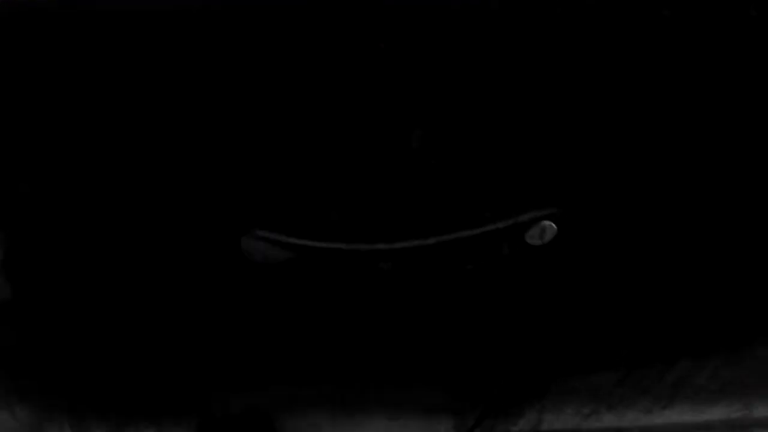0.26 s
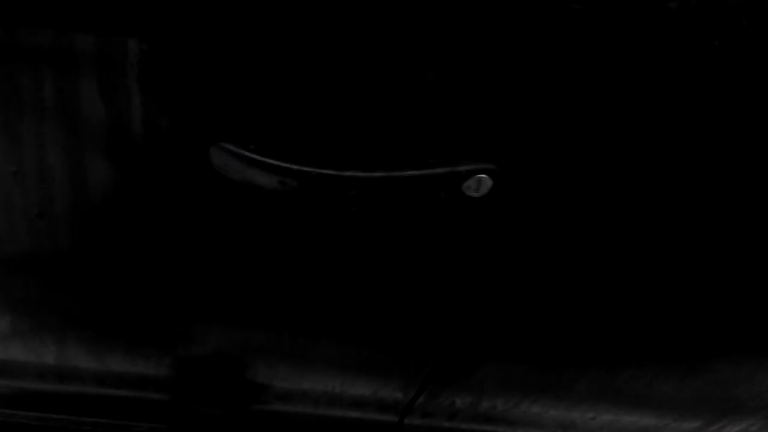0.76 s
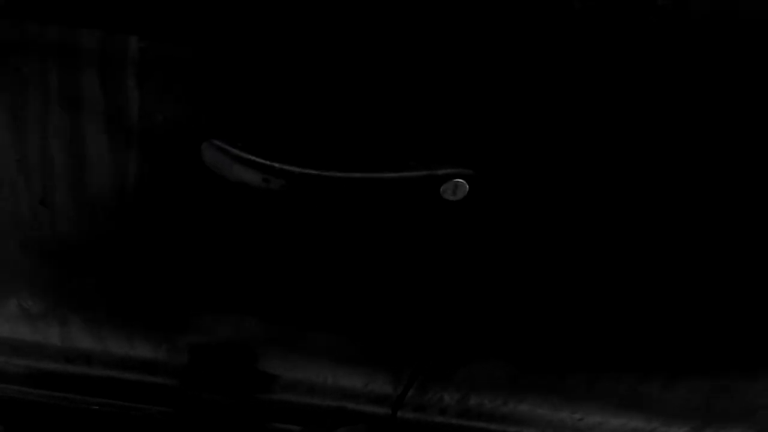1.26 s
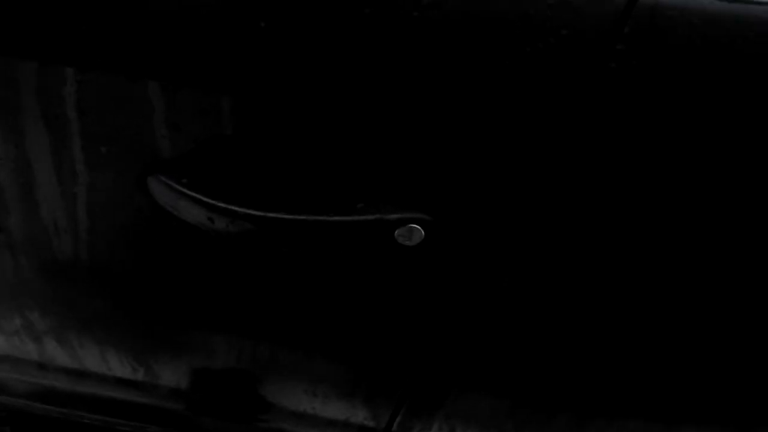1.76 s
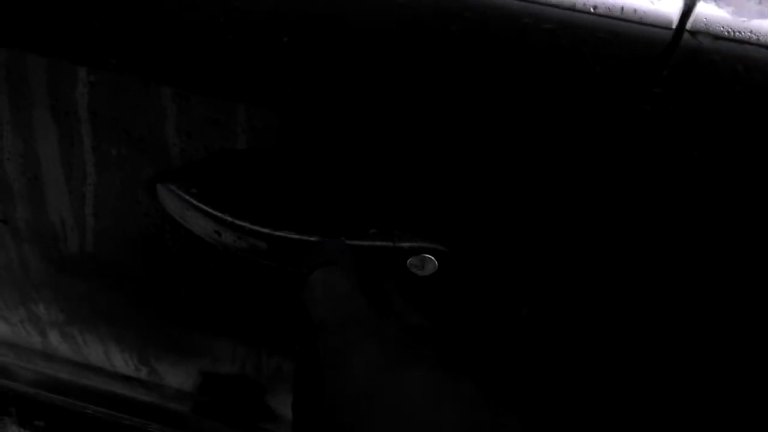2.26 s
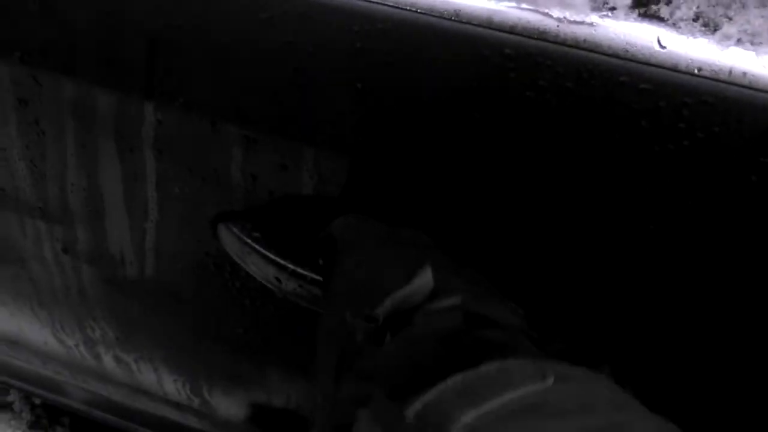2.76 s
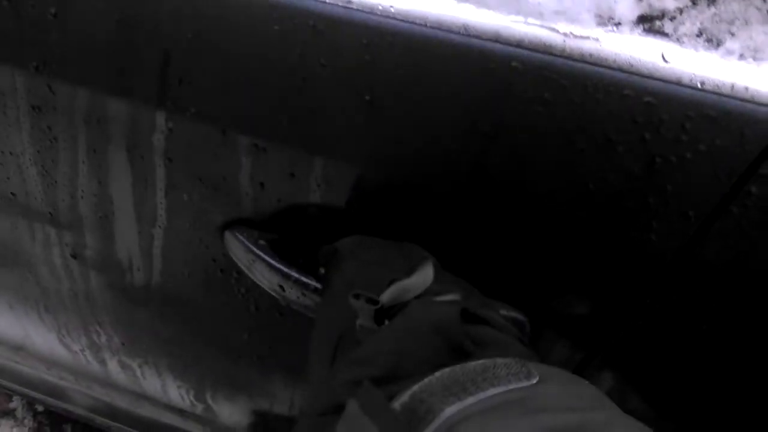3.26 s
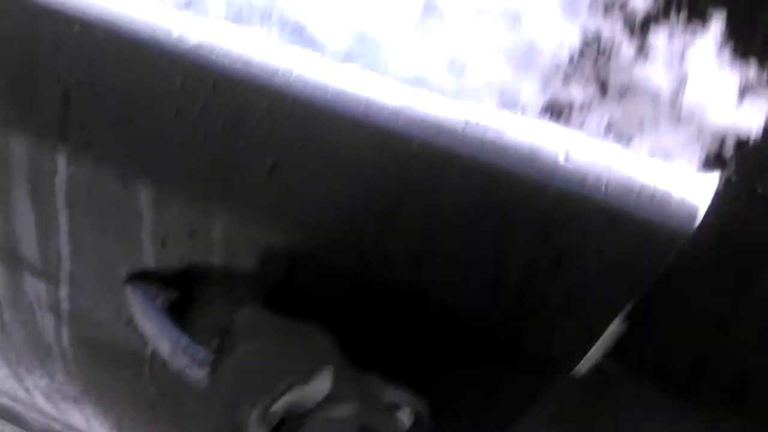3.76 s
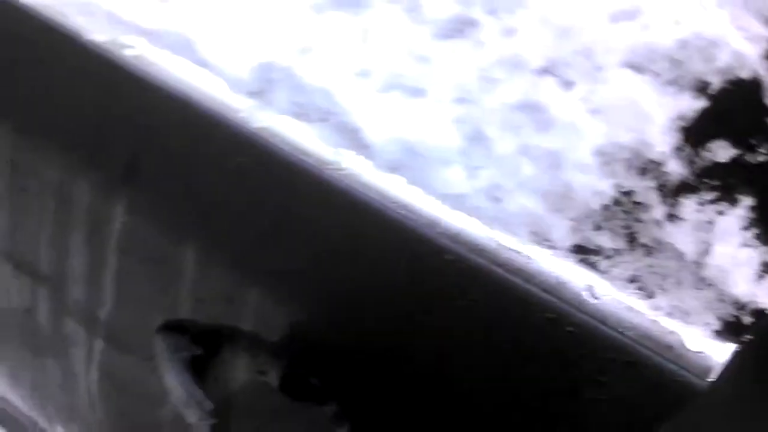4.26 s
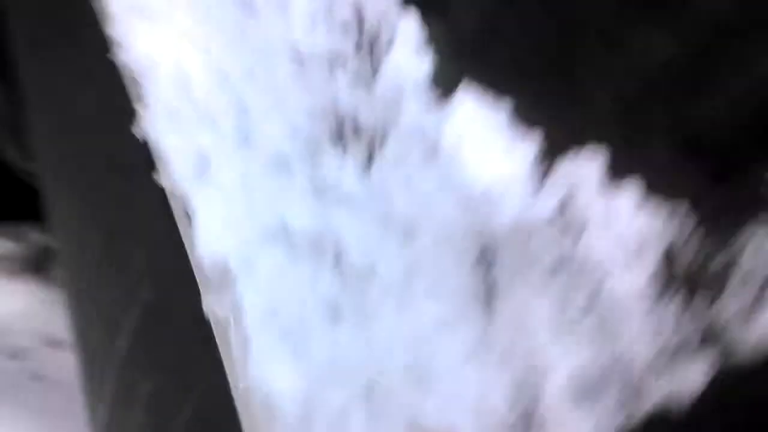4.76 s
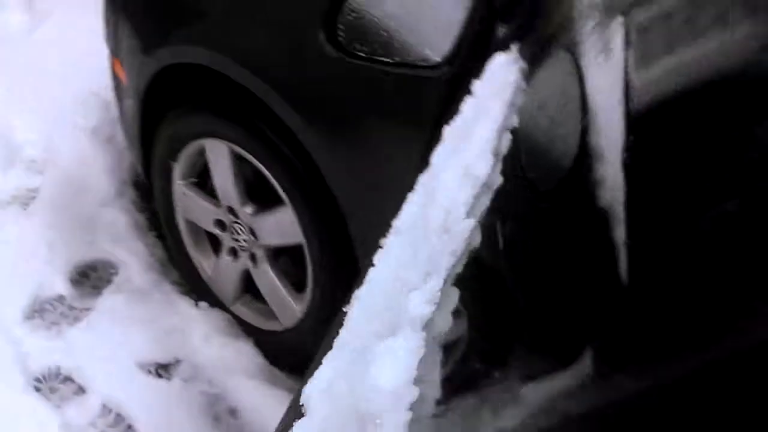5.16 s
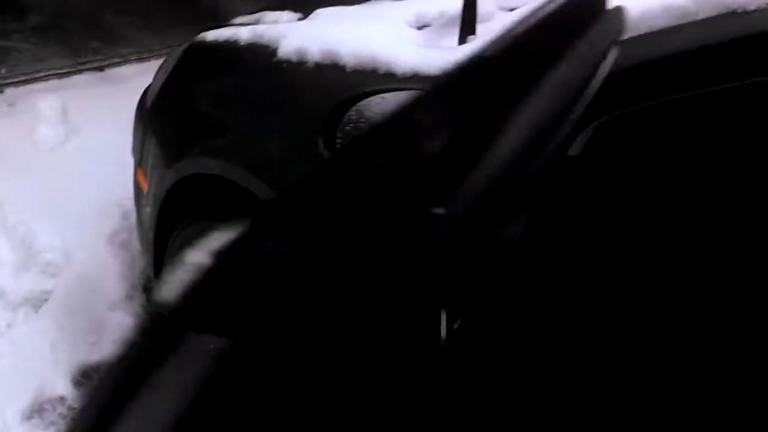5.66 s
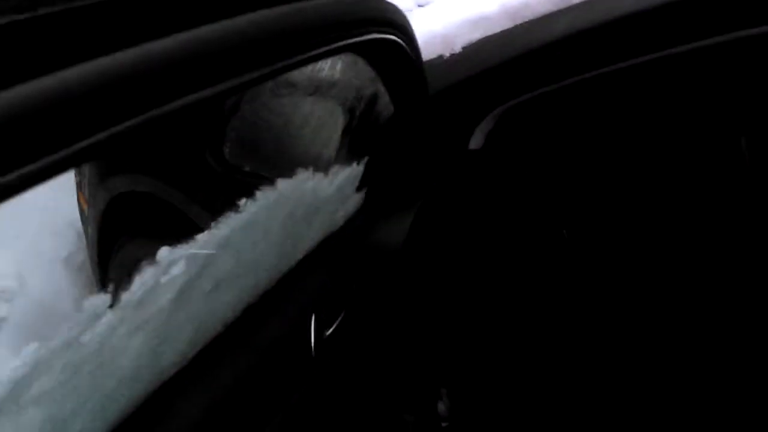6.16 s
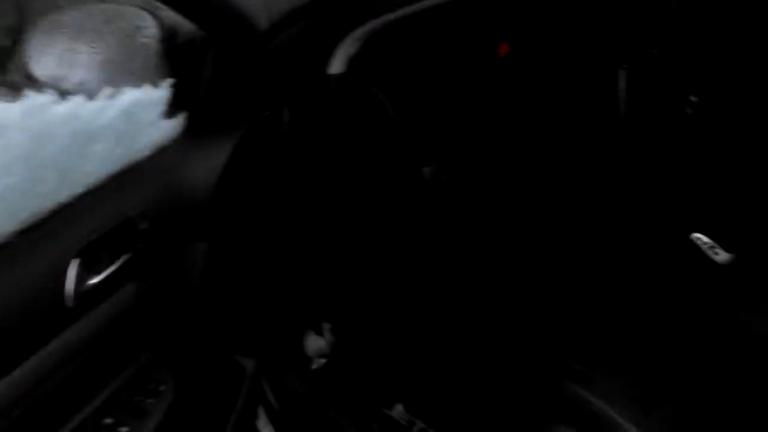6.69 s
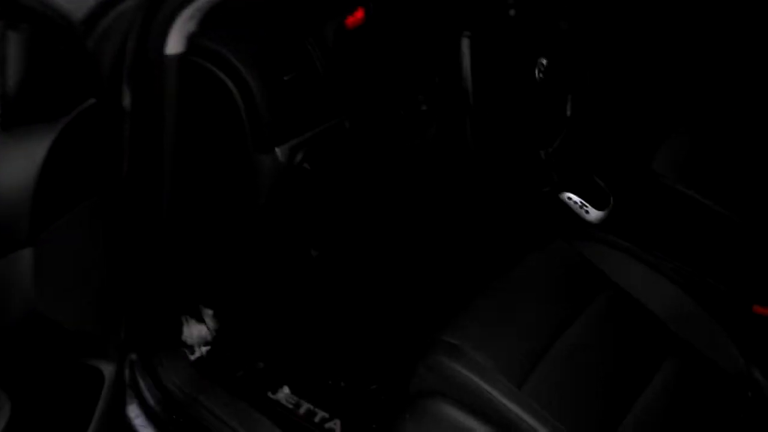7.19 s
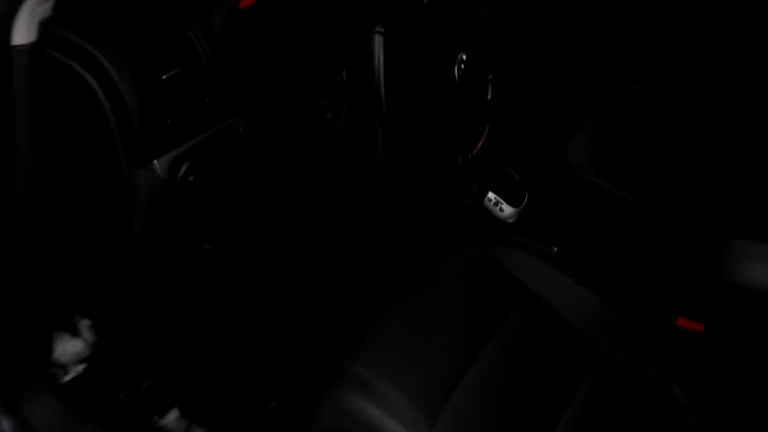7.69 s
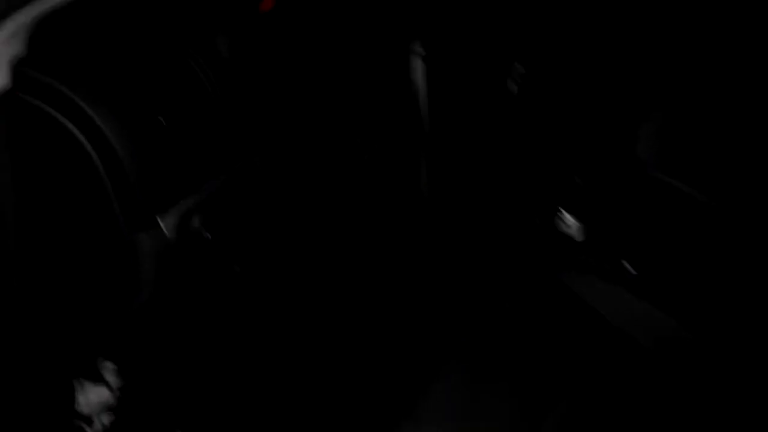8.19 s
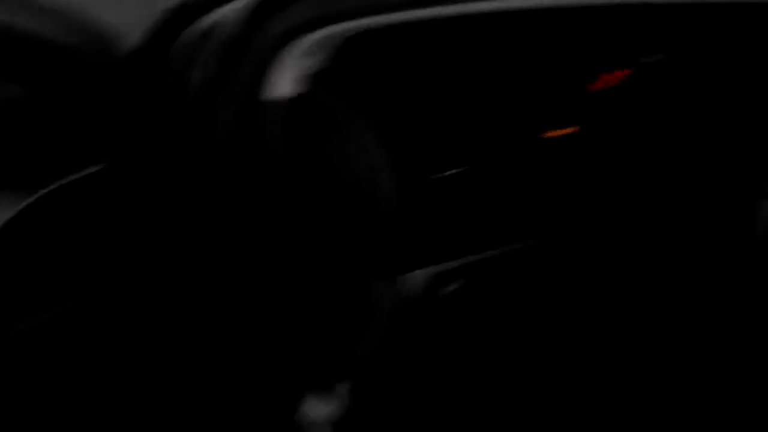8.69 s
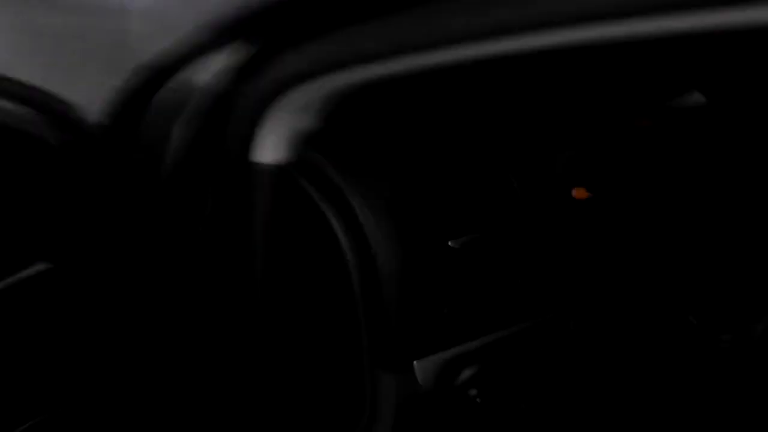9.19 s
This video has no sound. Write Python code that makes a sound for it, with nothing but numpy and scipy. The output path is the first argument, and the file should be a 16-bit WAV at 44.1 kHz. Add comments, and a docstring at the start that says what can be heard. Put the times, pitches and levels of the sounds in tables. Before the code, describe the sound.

A quiet, dry, snowy outdoor space with a very faint steady hush, everything within arm's reach. From 0 to 1.4 s a stiff jacket sleeve swishes in brisk, bright strokes, with crackling creases and a sharp fold snap near 1.35; a tiny squeak and key tick sit around 0.5. Then near silence until light taps on a door handle at 2.4-2.7. At 3.0 the handle groans very faintly, and at 3.3-3.5 the latch clunks in a quick cluster. Cloth rustles at 4.3, then the door knocks loudest at 4.6-4.9, a hard thump with rattle, followed by duller thuds at 5.4-5.6 under swelling sleeve rub. A soft key clink comes at 5.65. Keys jingle thin and high at 7.2-7.7 as the sleeve swishes strongly at 7.6. More crisp swishes and fold snaps follow at 8.4-8.5 with a metallic click, and at 9.0-9.3 with a soft bump.

```python
"""Beside a car on a quiet, snowy day: someone in a stiff winter jacket opens the door and leans in, keys in hand.
The sleeve swishes close to the microphone (noise in four bands, with popping creases and snapping folds).
Handle and latch thump the door panel, which knocks again as it swings over its stops (ringing modes and rattle).
The handle groans faintly (a roughened tone) and the keys clink now and then (high modes and a click).
Behind it all lies a faint, even hush of filtered noise."""
import sys
import numpy as np
from scipy import signal
from scipy.fft import rfft, irfft, next_fast_len
from scipy.io import wavfile
from scipy.ndimage import uniform_filter1d, map_coordinates

SR = 44100
rng = np.random.default_rng(int(sys.argv[2]) if len(sys.argv) > 2 else 0)


def master(y):
    """Save y as 16-bit WAV."""
    cut = np.clip(np.atleast_2d(y).T, -1, 1)
    pcm = np.round(cut * 32767)  # scale
    wavfile.write(sys.argv[1], SR, pcm.astype(np.int16))


N = 416304


def undb(db):
    """Decibels to gain."""
    return 10 ** (np.asarray(db) / 20)


def unit(x):
    """Scale to rms 1."""
    return x / np.sqrt(np.mean(x ** 2))


def noise(length):
    """Two unrelated channels of white noise."""
    return rng.standard_normal((2, length))


def colour(x, points):
    """Causal minimum-phase filter through (f/Hz, level/dB) points, built from the cepstrum."""
    size = 2 * next_fast_len(x.shape[-1] // 2 + 2048)
    hz, db = np.transpose(points)
    bins_hz = np.arange(size // 2 + 1) * SR / size
    curve_db = np.interp(np.log(bins_hz + 1), np.log(hz), db)
    cepstrum = irfft(np.log(undb(curve_db)))
    # folding the second half onto the first makes the filter causal
    cepstrum[1:size // 2] *= 2
    cepstrum[size // 2 + 1:] = 0
    response = np.exp(rfft(cepstrum))
    return irfft(rfft(x, size) * response)[..., :x.shape[-1]]


def band(x, lo_hz, hi_hz, order=4):
    """Band-pass."""
    edges_hz = [lo_hz, min(hi_hz, SR / 2 - 10)]
    return signal.sosfilt(signal.butter(order, edges_hz, "bandpass", fs=SR, output="sos"), x)


def lowpass(x, hz, order):
    """Low-pass."""
    return signal.sosfilt(signal.butter(order, hz, fs=SR, output="sos"), x)


def spread(pair):
    """Two unrelated signals as mid and side of a stereo pair, whose width varies with frequency."""
    # stereo width at the microphone: f/Hz, side minus mid level/dB
    side_width = [(60, -4), (200, -16.5), (700, -13), (1300, -3.5), (3000, -4), (8000, -2.5), (15000, -4.5)]
    side = colour(pair[1], side_width)
    return np.array([pair[0] + side, pair[0] - side])


def walk(rate):
    """Smooth random wander around 0, through 'rate' new values a second."""
    k = int(SR / rate)
    steps = np.repeat(rng.standard_normal(N // k + 1), k)
    return uniform_filter1d(steps, k)[:N]


def fade(t, t60):
    """Exponential decay by 60 dB in t60 seconds."""
    return np.exp(-np.log(1000) * t / t60)


def add(out, s, sound):
    """Mix a sound in at s seconds."""
    i = int(s * SR)
    out[:, i:i + sound.shape[-1]] += sound[..., :N - i]


def air(level_db=-61, drift_db=0.53):
    """Faint outdoor hush with microphone hiss: coloured noise whose level drifts slightly."""
    # spectrum of the hush: f/Hz, relative level/dB per Hz
    hush_tone = [(25, 6), (50, -6.5), (90, -11), (165, -4), (340, -8), (600, -10), (1160, -20),
                 (3000, -29.5), (6700, -27.5), (14800, -27.5), (16000, -23)]
    hush = unit(colour(spread(noise(N)), hush_tone))
    return hush * undb(level_db + drift_db * walk(1.2))


def squeaks(width_hz=110):
    """A short rub sings on one resonance; a rough one smears into a groan."""
    # faint squeaks, the second as the handle is pulled:
    # t/s, length/s, f/Hz, glide/(octaves per s), level/dB before the swell, roughness 0-1
    rubs = [(.445, .125, 545, 1.3, -55, .03), (3.0, .28, 585, 0, -54, .85)]
    out = np.zeros((2, N))
    for s, length, hz, glide, db, rough in rubs:
        t = np.arange(int(length * SR)) / SR
        judder = unit(lowpass(noise(N), width_hz / 2, order=2))[:, :len(t)]
        # steady and juddering shares, the judder in both size and phase
        size = np.sqrt(1 - rough) + np.sqrt(rough / 2) * (judder[0] + 1j * judder[1])
        turns = np.cumsum(hz * 2 ** (glide * t)) / SR
        tone = np.imag(size * np.exp(2j * np.pi * turns))
        swell = np.sin(np.pi * t / length)
        add(out, s, undb(db) * swell * tone)
    return out


def keys(reach_hz=1100, far_db=-14, ring_db=-4, click_db=-7, click_t60=0.042):
    """A touch rings one key most and its neighbours less; fingers and other keys damp the ring."""
    # keys touching: t/s, ring level/dB (ring_db is added), most excited f/Hz, share of the free ring time,
    # click level/dB (click_db is added), ring's left minus right level/dB
    touches = [(.541, -33, 12900, 0.64, -52, 7), (5.651, -21, 13600, 1, -32, 9),
               (5.848, -35, 12400, 1, -44, 7.5), (6.020, -42, 13500, 0.73, -63, 3),
               (7.187, -17, 14700, 0.44, -17.5, -6), (7.29, -19, 13400, 0.6, -21.5, -3),
               (7.305, -22, 14100, 0.53, -22.5, -3), (7.384, -33, 12500, 0.76, -33, 0),
               (7.472, -46, 12400, .46, -23, 0), (7.504, -25.5, 12700, .8, -30.5, 3),
               (7.685, -19.5, 12500, 0.79, -40, 2), (8.473, -23, 13300, .15, -11.5, 5),
               (8.775, -62, 13000, .3, -29.5, -5)]
    # what the keys ring with: f/Hz, relative level/dB, free t60/s
    key_modes = [(5346, 0, .07), (8920, -4, .1), (9900, -7, .1), (12315, -6, .07), (12385, -6, .07),
                 (13080, -4, .045), (13780, -14, .12), (14105, 1, .085), (14652, -7, .07), (14820, 0, .08)]
    # metal on metal: f/Hz, relative level/dB per Hz
    click_tone = [(500, -29), (1700, -2), (3200, 1), (5500, -6.5), (7500, -10.5), (10500, -9.5),
                  (15000, -9)]
    out, t = np.zeros((2, N)), np.arange(SR // 5) / SR
    for s, db, main_hz, free, tick_db, pan_db in touches:
        ring = 0
        for hz, mode_db, t60 in key_modes:
            nearness = np.exp(-((hz - main_hz) / reach_hz) ** 2)
            size = undb(mode_db) * (undb(far_db) + nearness)
            # such short waves reach the two ports out of step
            phase = 2 * np.pi * rng.random() + 2.5 * rng.standard_normal((2, 1))
            ring = ring + size * np.sin(2 * np.pi * hz * t + phase) * fade(t, t60 * free)
        click = unit(colour(spread(noise(len(t))), click_tone)) * fade(t, click_t60)
        pan = np.array([[pan_db], [-pan_db]]) / 2
        add(out, s, undb(db + ring_db + pan) * ring + undb(tick_db + click_db) * click)
    return out


def folds(pop_db=-3, crackle_db=-11):
    """A stiff fold snaps through with a few cycles of its own pitch and a wide crackle."""
    # snaps: t/s, level/dB (pop_db or crackle_db is added), f/Hz, t60/s
    snaps = [(.121, -13, 2280, 0.024), (0.652, -20, 2600, 0.011), (1.083, -34, 1190, .015),
             (1.339, -23, 260, .08), (1.349, -10.5, 1645, .017), (1.366, -18, 1530, 0.019),
             (4.36, -30.5, 2570, 0.045), (5.772, -29, 2590, 0.024), (5.795, -29.5, 2460, 0.01),
             (6.174, -36.5, 3700, 0.019), (6.179, -43.5, 1350, .1), (6.264, -35.5, 2320, 0.087),
             (6.877, -24, 2820, 0.0043), (7.075, -31.5, 2000, 0.013), (7.12, -32, 3850, .018),
             (7.182, -23, 2690, 0.036), (7.194, -21, 4140, 0.02), (7.238, -32.5, 3950, .01),
             (7.667, -18, 1920, .04), (7.68, -14, 1670, 0.047), (7.689, -18.5, 2260, .036),
             (8.474, -14, 3550, 0.019), (8.771, -25, 820, 0.0043), (9.01, -15, 2720, 0.039),
             (9.111, -21, 3100, 0.017)]
    out, t = np.zeros((2, N)), np.arange(SR // 10) / SR
    for s, db, hz, t60 in snaps:
        pop = np.sin(2 * np.pi * hz * t)
        crackle = unit(band(spread(noise(len(t))), hz / 2, hz * 1.14, order=2))
        add(out, s, undb(db) * fade(t, t60) * (undb(pop_db) * pop + undb(crackle_db) * crackle))
    return out


def creases(x, shift_db=3.0, size=512, count=64):
    """Narrow resonances of the creased cloth come and go within some 20 ms as it changes shape."""
    hz, _, frames = signal.stft(x, SR, nperseg=size)
    steps = frames.shape[-1]
    wander = unit(uniform_filter1d(rng.standard_normal((count, steps)), size=3, axis=1))
    place = 7 * np.log2(1 + hz / 300)  # in the treble, seven resonances an octave
    grid = np.meshgrid(place, np.arange(steps), indexing="ij")
    gain = undb(shift_db * map_coordinates(wander, grid, order=1))
    return signal.istft(frames * gain, SR, nperseg=size)[1][:, :N]


def sleeve(t, power, slips_per_s=4000, jerk_db=1.08, rub_hz=560, rasp_hz=2000, hiss_hz=6200):
    """Threads catch and slip by the thousand; pressed cloth rubs dully, a light touch rasps and hisses."""
    # spectrum of the cloth: f/Hz, relative level/dB per Hz
    cloth_tone = [(70, -24), (130, -14), (300, -9), (480, -13), (900, -0.5), (1150, -0.5), (1700, -1.5),
                  (2400, 2.5), (3200, 9.5), (4400, -1.5), (7000, -15.5), (10000, -12.5), (14600, -10),
                  (16000, -13.5)]
    # where the sleeve is: t/s, left minus right level/dB
    sleeve_side = [(0, -0.7), (1.35, -0.5), (2.2, -4.5), (3.6, -2.5), (4.35, 1), (4.9, -2.5), (5.5, 0.5),
                   (6.5, -2.5), (7.4, -2), (7.65, -1.5), (8.4, -2), (9.4, -0.5)]
    slips = rng.random(N) < slips_per_s / SR
    friction = unit(slips * noise(N)) + noise(N)  # grains over an equally strong smooth rub
    cloth = creases(colour(spread(friction), cloth_tone))
    # low edge f/Hz, high edge f/Hz, trim/dB of flap, rub, rasp and hiss
    parts = [(120, rub_hz, 0), (rub_hz, rasp_hz, 0), (rasp_hz, hiss_hz, -2.0), (hiss_hz, 18000, 5.5)]
    now = np.arange(N) / SR
    sound = 0
    for (lo_hz, hi_hz, trim_db), p in zip(parts, power):
        sound = sound + unit(band(cloth, lo_hz, hi_hz)) * undb(trim_db) * np.interp(now, t, np.sqrt(p))
    pan = np.interp(now, *np.transpose(sleeve_side))
    # the sleeve moves in little jerks
    return sound * undb(jerk_db * walk(160) + np.array([pan, -pan]) / 2)


def crinkles(t, power, per_s, size_db, scatter_db, centre_hz=2000, range_octaves=1.394, cycles=40):
    """Small creases pop at random, as loud as the cloth is moving, each with its own short ring."""
    out, age = np.zeros((2, N)), np.arange(SR // 20) / SR
    motion = np.sqrt(power[1] + power[2])  # rub and rasp
    for place, pitch, size, side in rng.random((int(per_s * N / SR), 4)):
        s = place * N / SR
        hz = centre_hz * 2 ** (range_octaves * (2 * pitch - 1))
        # many small pops, few large ones
        pop_db = size_db + scatter_db * min(-np.log(1 - size), np.e)
        gain = np.interp(s, t, motion) * undb(pop_db)
        pan = np.sqrt([[side], [1 - side]])
        add(out, s, gain * pan * np.sin(2 * np.pi * hz * age) * fade(age, cycles / hz))
    return out


def cloth_powers(db, dull_db, hiss_db, flap_db):
    """Powers of flap, rub, rasp and hiss: rub and rasp share the level, flap and hiss stand relative to it."""
    rasp = 1 / (1 + undb(dull_db) ** 2)
    shares = [undb(flap_db) ** 2, 1 - rasp, rasp, undb(hiss_db) ** 2]
    return np.outer(shares, undb(db) ** 2)


def swishes(t, drop_db=28.5, sag_db_per_s=13.5):
    """Each swish gathers speed, sags a little as the arm slows during the hold, and dies away."""
    # swishes of the sleeve over the jacket, levels before the sleeve's trims: t/s at full speed, attack/s,
    # hold/s, release/s, level/dB, dull rub over bright rasp/dB, hiss of the weave/dB, flap of the cloth/dB
    strokes = [(0.106, 0.045, 0.052, .14, -27, -10.5, -9.5, -18.5),
               (0.267, 0.053, 0.035, 0.16, -37.5, -7.5, -8.5, -12),
               (0.393, 0.052, .005, 0.019, -42.5, 0, -11.5, -29),
               (0.658, 0.012, .006, 0.033, -25, -12.5, -14.5, -15),
               (0.688, .025, 0.051, 0.081, -33.5, -10.5, -13, -13.5),
               (0.956, 0.061, 0.017, 0.25, -47.5, 4, -15.5, -13.5),
               (1.093, 0.052, 0.02, 0.087, -34.5, 1.5, -22, -11),
               (1.343, .024, 0.018, 0.041, -29, 2, -14.5, -12.5),
               (3.128, .12, 0.067, .15, -57, -2.5, -15, 1), (3.222, .05, 0.1, 0.095, -53, -2, -14, -7),
               (3.726, .07, 0.027, 0.09, -56.5, 4, -10, -5),
               (4.317, 0.043, 0.037, 0.14, -42.5, -9, -18.5, -12.5),
               (4.477, .08, 0.18, 0.2, -50, -9.5, -11, -11.5),
               (4.639, 0.016, .006, 0.049, -38, -4.5, -28, 1), (4.79, 0.24, 0.27, 0.16, -41, 5, -17, 2),
               (5.071, 0.6, 0.0077, 0.14, -33.5, -8, -11.5, -13),
               (5.371, 0.3, .008, 0.025, -43.5, -12, -12.5, -11.5),
               (5.548, .16, .005, 0.055, -34, -15, -14, -10),
               (6.27, 0.53, 0.015, 0.3, -49, -6.5, -13, -8.5),
               (6.463, 0.15, 0.27, 0.082, -52.5, -17, -11, -15),
               (7.15, 0.67, 0.083, .03, -45, -10.5, -17, -44), (7.6, 0.027, 0.014, 0.19, -27, -7, -15, -36),
               (7.672, 0.067, 0.022, 0.064, -24.5, -4, -22.5, -14),
               (7.806, 0.037, 0.037, 0.18, -36, -10.5, -12, -7), (8.293, .08, .02, 0.16, -56, 5, -7, -22),
               (8.402, 0.011, 0.032, 0.15, -26, -3.5, -17, -23),
               (8.502, 0.09, 0.035, 0.047, -29, -10.5, -14, -17),
               (8.612, .08, 0.06, 0.075, -48, -8, -9.5, -9.5),
               (8.973, .012, 0.027, .04, -33.5, 3.5, -14, -20.5),
               (9.001, 0.032, 0.016, 0.2, -23.5, -8.5, -20, -22),
               (9.1, 0.13, 0.0073, 0.17, -30.5, -9, -11, -10),
               (9.245, 0.1, 0.0065, 0.048, -33, -15.5, -14, -20)]
    power = 0
    for s, attack, hold, release, db, *tone in strokes:
        # the level falls by drop_db over one attack or release time
        away = np.maximum(s - t, 0) / attack + np.maximum(t - s - hold, 0) / release
        sag_db = sag_db_per_s * np.clip(t - s, 0, hold)
        power = power + cloth_powers(db - drop_db * away - sag_db, *tone)
    return power


def jacket():
    """Swishes close to the microphone over a soft rustle; both set creases popping."""
    # soft rustle between swishes, before the sleeve's trims: t/s, level/dB
    rustle_level = [(0, -62.5), (.6, -56), (1.25, -62.5), (1.45, -60), (1.6, -76.5), (2.15, -72.5),
                    (2.55, -60), (2.92, -60.5), (3.03, -65.5), (4.15, -60.5), (4.25, -66.5), (5.3, -60.5),
                    (5.8, -60), (5.92, -65.5), (6.2, -59), (6.78, -62), (6.9, -58.5), (7.95, -50),
                    (8.2, -65), (8.93, -63), (9.43, -56.5)]
    # make-up of the rustle: dull rub over bright rasp/dB, hiss/dB, flap/dB
    rustle_tone = (-6, -5.5, -6)
    t = np.arange(0, N, 44) / SR  # about every millisecond
    swish = swishes(t)
    rustle = cloth_powers(np.interp(t, *np.transpose(rustle_level)), *rustle_tone)
    swish_pops = crinkles(t, swish, per_s=90, size_db=-4.0, scatter_db=4.5)
    rustle_pops = crinkles(t, rustle, per_s=30, size_db=2.5, scatter_db=5)
    return sleeve(t, swish + rustle) + swish_pops + rustle_pops


def contacts(panel_hz, step_db=1.5, jitter=0.036, rebound_hard_hz=550, settle=0.3):
    """Every blow, then rebounds that land on the seal, no harder, each step_db above the one before."""
    # blows on the door from handle, latch and hinge stop: t/s, level/dB before filtering,
    # contact hardness f/Hz, most excited f/Hz, rebounds (rounded; none below 1/2), gap between them/s,
    # first rebound relative to the blow/dB
    blows = [(2.409, -36.5, 1780, 820, 2, 0.012, -7), (2.571, -49.5, 900, 766, 1, 0, -1),
             (2.697, -42.5, 1100, 603, 0, 0, 0), (3.273, -27, 1500, 243, 2.5, .0112, 0),
             (3.371, -28, 1210, 323, 4, 0.0077, -0.5), (3.405, -15.5, 302, 190, -0.5, 0, 7),
             (3.414, -12.5, 1610, 750, 0.5, 0, 0), (3.418, -12, 890, 188, 0, 0, -5.5),
             (3.422, -11.5, 700, 307, 2, .013, -11.5), (3.467, -24, 450, 201, 0, 0, 0),
             (3.485, -21.5, 600, 200, 3, .0125, -6.5), (3.655, -36, 700, 590, -1, 0, 6.5),
             (3.663, -27.5, 387, 191, -1, 0, 14), (4.24, -42.5, 346, 186, 0.5, 0, 0),
             (4.646, -28, 550, 292, 2, 0.012, 4), (4.719, -26.5, 300, 232, 1, 0.00058, 1),
             (4.733, -20.5, 2400, 330, 1, .018, -13), (4.780, -4, 1710, 774, 1.5, 0.0074, -14.5),
             (4.797, -18, 1890, 165.5, 1.5, .018, -14), (4.9, -17.5, 750, 324, 0, 0, 0),
             (4.926, -19.5, 550, 345, 1, 0.0088, -8), (5.362, -27.5, 330, 194, -0.5, 0.0028, 1),
             (5.406, -16.5, 396, 380, 2, .0105, -7.5), (5.457, -23.5, 2200, 423, -0.5, 0, 0),
             (5.472, -27.5, 350, 184, 0.5, 0, 1), (5.513, -14.5, 200, 105, 0, 0, 11.5),
             (5.559, -23.5, 497, 305, -1, 0, 0), (5.669, -36.5, 250, 189, 1, .016, 3.5),
             (5.776, -39, 450, 290, 0, 0, 0), (5.939, -46, 350, 233, 0, 0, 0),
             (7.809, -38.5, 450, 192, 0, 0, -8), (9.14, -31.5, 300, 149, 2.5, 0.0029, -5)]
    for s, db, hard_hz, main_hz, rebounds, gap, first_db in blows:
        yield s, db, hard_hz, main_hz
        # the weight of a rebound moves toward the panel's boom
        rebound_hz = main_hz * (panel_hz / main_hz) ** settle
        for k in range(round(rebounds)):
            late = gap * (k + 1 + jitter * rng.standard_normal())
            yield s + late, db + first_db + k * step_db, min(hard_hz, rebound_hard_hz), rebound_hz


def door(reach_octaves=0.39, far_db=-11, ring_db=-4, rattle_db=-11, rattle_t60=0.058, cavity_db=-28,
         cavity_t60=0.25, lowest_hz=128, panel_hz=195, spot_slope=0.58, grip_until_s=4.5, grip_ring=0.85):
    """Each blow rings the panel and shakes the latch parts; a soft contact leaves only the thud."""
    # what the door rings with: f/Hz, relative level/dB, free t60/s
    door_modes = [(100, -27, .15), (140.2, -3, 0.15), (176, -2.5, .175), (199.6, 2.5, 0.076),
                  (290.6, 2, 0.049), (397, 0, 0.032), (512, -12, 0.073), (608, -2.5, 0.074),
                  (710, -23, 0.12), (762, -5, 0.087), (802, -8, 0.018), (1117, -12, 0.074),
                  (1315, -1, 0.05), (1375, -17, 0.11), (1690, -8, 0.12), (2440, -5.5, .08), (3094, -3, 0.1),
                  (3533, -10.5, 0.067)]
    # loose latch parts: f/Hz, relative level/dB per Hz
    rattle_tone = [(100, -24.5), (200, -4.5), (500, 3.5), (850, 8), (1100, -1), (2300, 2.5), (3200, 8.5),
                   (4500, -1.5), (7000, -18), (15000, -25.5)]
    out, t = np.zeros((2, N)), np.arange(SR // 4) / SR
    hz, mode_db, t60 = np.transpose(door_modes)
    waves = np.sin(2 * np.pi * hz[:, None] * t)
    free = waves * fade(t, t60[:, None])
    # the hand on the handle shortens the ring
    gripped = waves * fade(t, grip_ring * t60[:, None])
    shake = undb(rattle_db) * fade(t, rattle_t60) + undb(cavity_db) * fade(t, cavity_t60)
    loose = unit(colour(spread(noise(N)), rattle_tone))
    for s, db, hard_hz, main_hz in contacts(panel_hz):
        # the spot that is hit favours some modes
        nearness = np.exp(-(np.log2(hz / main_hz) / reach_octaves) ** 2)
        sizes = undb(ring_db + mode_db) * (undb(far_db) + nearness)
        ring = sizes @ (gripped if s < grip_until_s else free)
        rattle = loose[:, int(s * SR):][:, :len(t)] * shake
        # give in the seal and in the hand rounds off the push
        soft = lowpass(ring + rattle, hard_hz, order=1)
        # a blow on a stiff, high-ringing spot loses its bass
        low_hz = min(lowest_hz * (main_hz / panel_hz) ** spot_slope, 0.78 * main_hz)
        add(out, s, undb(db) * band(soft, low_hz, min(7 * hard_hz, 15000)))
    return out


def scene():
    """Everything is within arm's reach, and the snow around gives no echo."""
    return air() + squeaks() + keys() + folds() + jacket() + door()


def record(dry, low_cut_hz=85, top_hz=16000):
    """The two microphone ports colour the sound differently; deep bass and the top are cut."""
    # difference between the ports: f/Hz, left minus right level/dB
    port_balance = [(200, 1), (600, 0.5), (1200, 5), (2300, 1.5), (4400, -1.3), (8000, 2.5), (15000, 1.5)]
    left = colour(dry[0], [(hz, db / 2) for hz, db in port_balance])
    right = colour(dry[1], [(hz, -db / 2) for hz, db in port_balance])
    low_cut = signal.butter(2, low_cut_hz, "highpass", fs=SR, output="sos")
    thin = signal.sosfilt(low_cut, np.array([left, right]))
    return signal.sosfilt(signal.ellip(10, .2, 70, top_hz, fs=SR, output="sos"), thin)


dry = scene()
out = record(dry)
master(out)
```